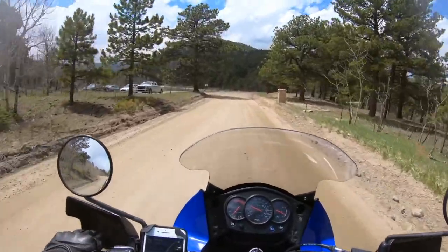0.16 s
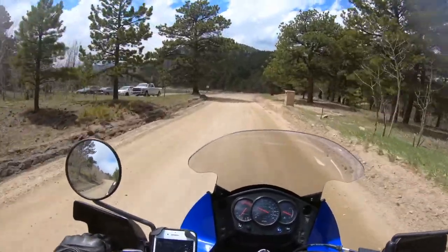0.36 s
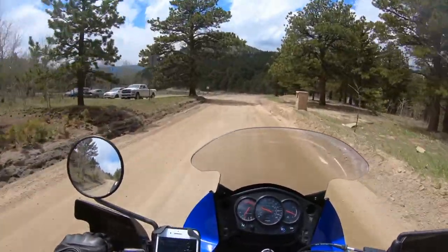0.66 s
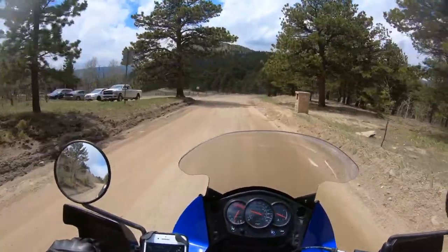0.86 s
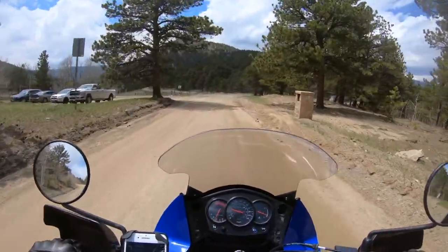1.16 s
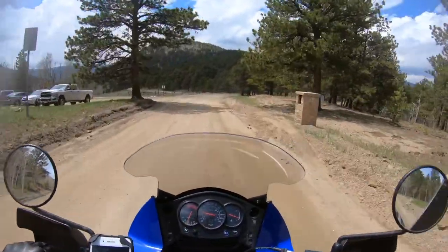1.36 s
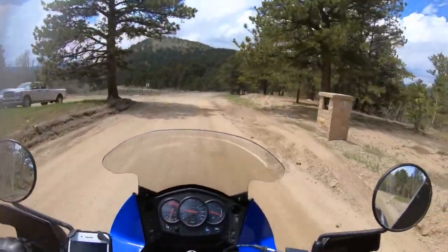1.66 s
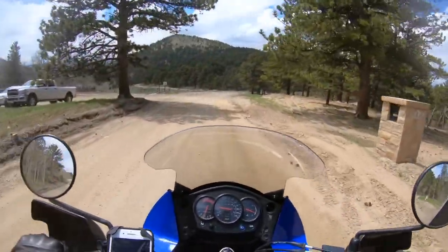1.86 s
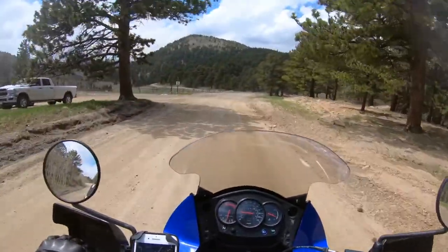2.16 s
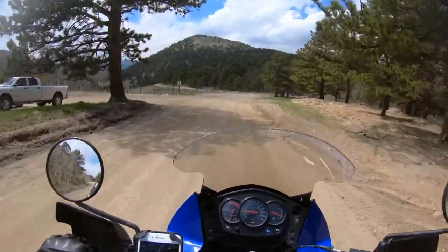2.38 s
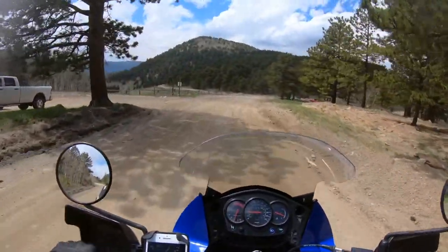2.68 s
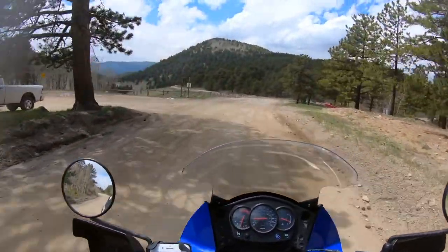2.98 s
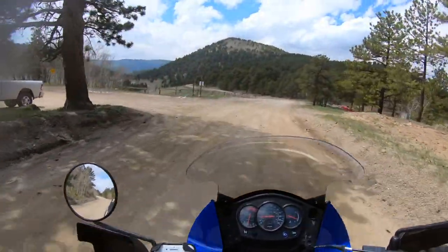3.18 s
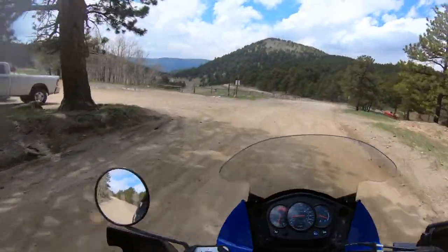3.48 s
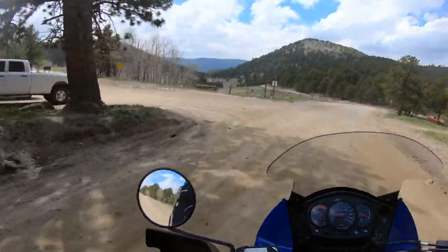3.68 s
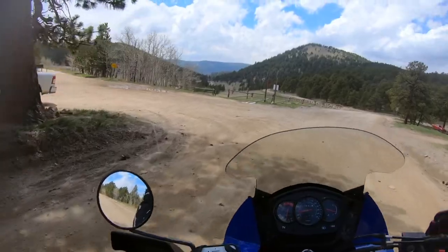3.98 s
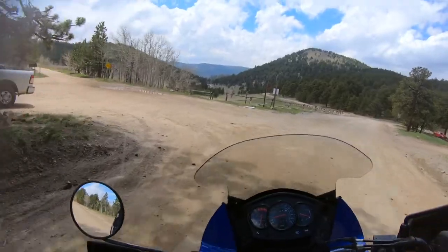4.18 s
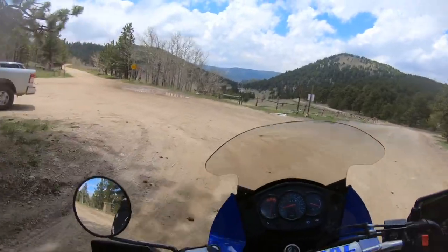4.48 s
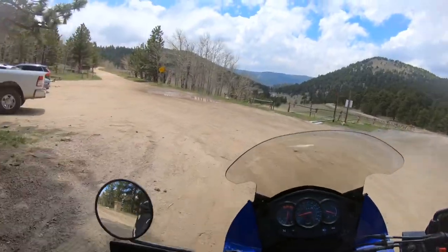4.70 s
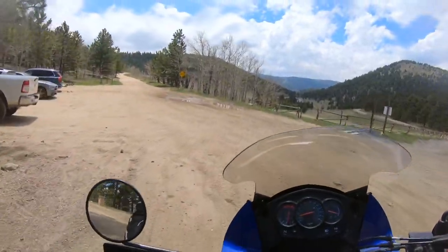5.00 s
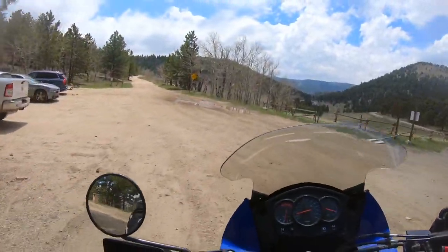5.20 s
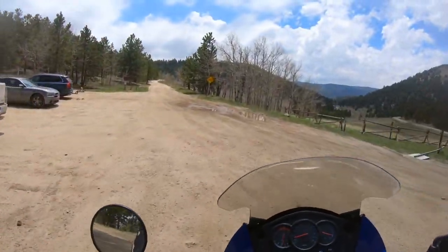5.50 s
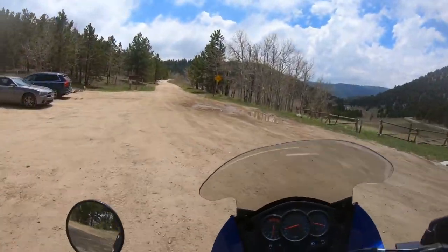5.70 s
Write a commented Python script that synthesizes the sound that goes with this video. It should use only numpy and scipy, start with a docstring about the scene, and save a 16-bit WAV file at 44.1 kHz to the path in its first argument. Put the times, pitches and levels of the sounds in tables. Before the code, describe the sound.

Close onboard sound of a thumping one-cylinder motorcycle: uneven hollow exhaust pops and a clattering engine case while it slows, a sharp bump with a short loose panel rattle, more scattered pops, a few weak beats, then a regular loaded chug. Tyres crunch over fine gravel beneath, with short sandy scrubs near the end. Low wind buffets the microphone; the place is open and without echo.

```python
"""A big single-cylinder engine barks and thuds unevenly, then pulls steadily: pulses ringing in an exhaust.
It drives a motorcycle on a gravel road, heard from the rider's seat; the case clatters and valves tick.
A bump knocks and shakes the panels: short damped rings. Filtered random clicks and noise make the tyres
crunch and scrub, and low noise makes the wind rumble on an overloaded microphone."""
import sys
import numpy as np
from scipy import signal
from scipy.fft import rfft, irfft
from scipy.io import wavfile

SR = 44100
rng = np.random.default_rng(int(sys.argv[2]) if len(sys.argv) > 2 else 0)


def generate_wav(sig):
    """Save sig (samples, or channels by samples) to the path in sys.argv[1] as 16-bit PCM at SR."""
    pcm = np.round(np.clip(np.atleast_2d(sig).T, -1, 1) * 32767).astype(np.int16)
    wavfile.write(sys.argv[1], SR, pcm)


N = 257984
TIME = np.arange(N) / SR  # seconds
BIN_HZ = np.arange(N // 2 + 1) * SR / N

# How fast the engine turns. Each row: time in seconds, speed in revolutions per minute.
ENGINE_SPEED = [(0.0, 2775.0), (0.54, 2558.0), (0.94, 2348.0), (1.21, 2280.0), (1.37, 2134.0),
                (1.78, 2066.0), (2.02, 1726.0), (2.09, 1917.0), (2.37, 2243.0), (2.94, 2020.0),
                (3.03, 1988.0), (3.32, 1955.0), (3.56, 1815.0), (4.54, 1783.0), (4.65, 1741.0),
                (5.1, 1893.0), (5.3, 1727.0), (5.68, 1923.0), (5.85, 1859.0)]


def undb(db):
    """Turn decibels into gain."""
    return 10 ** (np.asarray(db) / 20)


def curves(table):
    """The columns of a table, joined by straight lines in time."""
    s, *columns = np.transpose(table)
    return [np.interp(TIME, s, column) for column in columns]


def unit(x):
    """Scale to rms 1."""
    return x / np.sqrt(np.mean(x ** 2))


def band(hz, width):
    """Response of one resonance, gain 1 at the centre; width in Hz."""
    s = 1j * BIN_HZ
    return width * s / (s * s + width * s + hz * hz)


def modes(table):
    """Response of a body with several resonances."""
    return sum(undb(db) * band(hz, width) for hz, width, db in table)


def colour(points):
    """Response drawn through points of frequency in Hz and level in dB."""
    hz, db = np.transpose(points)
    return undb(np.interp(np.log(BIN_HZ + 1), np.log(hz), db))


def through(x, response):
    """Filter a whole sound."""
    return irfft(rfft(x) * response, N)


def strike(times, sizes, shape):
    """Place one copy of the first quarter second of a shape at each time."""
    positions = np.clip(np.asarray(times) * SR, 0, N - 1).astype(int)
    pulses = np.bincount(positions, sizes, N)
    return signal.fftconvolve(pulses, shape[:SR // 4])[:N]


def strike_tuned(times, sizes, pitches, shape):
    """Like strike, with each copy played faster or slower by its pitch ratio."""
    out, age = np.zeros(N + SR), np.arange(SR // 4)
    for s, size, pitch in zip(times, sizes, pitches):
        start = max(int(s * SR), 0)
        out[start + age] += size * np.interp(age * pitch, age, shape[age], right=0)
    return out[:N]


def ring(response):
    """The ring after one pulse, with peak 1."""
    shape = irfft(response, N)
    return shape / np.abs(shape).max()


def soften(x, ms):
    """Spread a push over a few milliseconds with a bell-shaped blur."""
    return through(x, np.exp(-.5 * (2 * np.pi * BIN_HZ * ms / 10 ** 3) ** 2))


def grains(rate, spread_db):
    """Random clicks, rate per second on average, most small and a few large; rms 1."""
    sizes = undb(spread_db * np.minimum(rng.exponential(size=N), 6))
    happens = rng.random(N) < rate / SR
    return unit(happens * sizes * rng.choice([-1, 1], N))


def walk(count):
    """A smooth random wander with rms 1, through count random points a second."""
    return unit(signal.resample(rng.standard_normal(int(count * N / SR)), N))


def gate(cycle, centre, width):
    """A smooth window that opens once per engine cycle; centre and width in cycles."""
    distance = (cycle - centre + .5) % 1 - .5
    return np.exp(-.5 * (distance / width) ** 2)


def exhaust():
    """Each stroke barks in the pipe and thuds in the silencer; a second push grows with throttle."""
    # Colour of the rough gas. Each row: frequency in Hz, relative level in dB.
    crack_colour = [(200, -15.5), (550, -1), (950, -6.5), (1300, -8.5), (1700, -11), (2400, -31),
                    (8000, -54.5)]
    s, bark, weight, throttle = strokes()
    # the pitch scatters most with the throttle shut
    heat = 1 + 0.029 * (1 - throttle) * rng.standard_normal(len(s))
    # two chambers in series, then the longer ring of the tailpipe
    pipe = ring(band(210, 53) * band(291.1, 29.6) * (1 + 5.83 * band(343.55, 16)))
    blowdown = strike_tuned(s - .002, 1.162 * bark, heat, pipe)
    # the pressure in the silencer dips as the valve opens
    thud = soften(strike(s - .0013, -undb(.5) * weight, ring(band(73, 38))), ms=1.15)
    # the rising piston drives out the rest of the charge into the warmed pipe
    sweep = strike_tuned(s + 0.003926, -1.1 * bark * throttle ** 2.5, 1.02 * heat, pipe)
    boom_size = -(.4 + 1.4 * throttle ** 2) * np.sqrt(weight)
    boom = soften(strike(s + 0.01, boom_size, ring(band(73.6, 16.6))), ms=2.97)
    # the tailpipe sings on between strokes, with an overtone; both grow with throttle
    tail = strike(s + 0.00941, 0.049 + 0.11 * throttle, ring(band(341, 20) * band(370, 230)))
    overtone_times = s + .001 * rng.standard_normal(len(s))
    overtone_ring = ring(band(546, 12) * band(546, 200))
    overtone = strike(overtone_times, bark * (0.27 + throttle), overtone_ring)
    # hard firings at low throttle snap most, with a burst of rough gas
    hard = np.minimum(bark, 1.1) ** 3 * (1 - throttle ** 3)
    snap_ring = ring((band(690, 110) + .3 * band(1600, 350)) * band(800, 1200))
    snap = strike(s - .0028, .11 * hard, snap_ring)
    burst = soften(strike(s - .0028, hard, np.exp(-TIME / .007)), ms=0.66)
    crack = burst * unit(through(rng.standard_normal(N), colour(crack_colour)))
    return (blowdown + thud + sweep + boom + tail + undb(-31) * overtone
            + snap + undb(-19.0) * crack)


def strokes():
    """Time, bark, thud and throttle of the strokes: more throttle is louder and steadier."""
    # Unburnt mixture catches in a pop. Each row: time in seconds, relative bark level in dB.
    pops = [(.105, -1), (.42, -0.7), (.56, -0.1), (.703, -3), (.802, -2.9), (.953, -0.7), (1.108, -1.2),
            (1.266, -7.5), (1.376, -7.5), (1.49, -6), (1.603, -2), (1.776, -3), (2.274, -2.5),
            (2.382, -2.5), (2.491, -1.5), (2.601, -6.5), (2.772, -4.5), (2.888, -4.5), (3.007, -2.4),
            (3.129, -5), (3.249, -4)]
    # A stroke falls weak. Each row: time in seconds, change of bark and thud level in dB.
    stumbles = [(.287, -0.5), (2.217, -2.5), (3.065, -2), (3.312, -4.5), (3.57, -7), (3.702, -6),
                (3.835, -3.5), (4.034, -5.5), (4.236, -3), (4.369, -10)]
    shut_db, rise_db = -13, 9  # bark with the throttle shut, and its rise at full throttle
    pop_lead_s, pop_thud_db = 0.0034, -1  # how early a pop leaves the pipe, and its thud
    _, s = crank()
    throttle = opening(s)
    scatter_db = 1.04 * (1.2 - throttle) * rng.standard_normal((len(s), 2)).T
    bark_db = shut_db + rise_db * throttle + scatter_db[0]
    thud_db = .5 * scatter_db[1]
    # each pop or stumble takes the nearest stroke
    for at, db in pops:
        k = np.argmin(abs(s - at))
        s[k] -= pop_lead_s
        bark_db[k], thud_db[k] = db, pop_thud_db
    for at, db in stumbles:
        k = np.argmin(abs(s - at))
        bark_db[k] += db
        thud_db[k] += db
    return s, undb(bark_db), undb(thud_db), throttle


def crank():
    """Engine cycles run so far, each two revolutions, and the times the exhaust valve opens."""
    first_stroke_s = .0219
    rpm, = curves(ENGINE_SPEED)
    cycle = np.cumsum(rpm / 60 / 2) / SR
    cycle = cycle - np.interp(first_stroke_s, TIME, cycle)
    return cycle, np.interp(np.arange(int(cycle[-1]) + 1), cycle, TIME)


def opening(s):
    """Throttle opening at the given times, which sets the load on the engine."""
    # The rider's hand. Each row: time in seconds, throttle from 0 (shut) to 1 (full).
    throttle_points = [(0, 0.12), (1.65, 0), (1.78, .4), (1.9, 0.2), (1.98, .68), (2.15, 0.6), (2.35, .48),
                       (2.8, .33), (2.98, .05), (3.3, .05), (3.48, .88), (4.4, .9), (4.65, 0.98),
                       (5.85, 0.99)]
    return np.clip(np.interp(s, *np.transpose(throttle_points)), 0, 1)


def machinery(clatter_db):
    """Piston slaps and gears rattle the case; valves tick as they seat; the chain hisses with load."""
    # Resonances of engine case and fairing. Each row: frequency in Hz, width in Hz, relative level in dB.
    case_modes = [(560.6, 73, 6.5), (677, 55, 5.5), (799, 42, -0.5), (886.6, 30.2, 5), (1134, 80, -8.5),
                  (1450, 45, -25.5)]
    # Resonances of the valve gear. Each row: frequency in Hz, width in Hz, relative level in dB.
    valve_modes = [(3600, 450, -5), (6156, 100, 0), (6384, 90, -1)]
    cycle, s = crank()
    throttle, load = opening(TIME), opening(s)
    rpm, = curves(ENGINE_SPEED)
    body = modes(case_modes) * band(650, 850)
    # one slap shortly before each exhaust stroke, harder and earlier on throttle
    chance = rng.standard_normal((len(s), 4)).T
    force = (.5 + .5 * load) * undb(1.6 * chance[0])
    slap_times = s - .007 - 0.0066 * load + 0.00091 * chance[1]
    slap = soften(strike(slap_times, force, ring(body)), ms=0.11)
    # a lighter clack after the stroke grows with load
    clack_ring = ring(band(930, 36) * band(930, 500))
    clack = strike(s + .016 + .0012 * chance[2], load * undb(1.8 * chance[3]), clack_ring)
    # the gears mesh more loudly at two points of the cycle
    driven = (0.11 + 0.16 * throttle) * gate(cycle, centre=0.11, width=0.22)
    slack = .45 * (1 - throttle) * gate(cycle, centre=.8, width=0.041)
    gears = through(grains(rate=2500, spread_db=0.5) * (0.65 + driven + slack), body)
    # under load a hollow resonance of the case stands out
    hollow_clicks = grains(rate=2500, spread_db=0.5) * gate(cycle, centre=.85, width=.15)
    hollow_ring = unit(through(hollow_clicks, band(545, 40) ** 2))
    hollow = throttle * undb(clatter_db - 8) * hollow_ring
    seating = .25 + gate(cycle, centre=.28, width=.04) + .45 * gate(cycle, centre=.88, width=.05)
    valve_clicks = grains(rate=2600, spread_db=1.9) * seating
    ticks = through(valve_clicks, modes(valve_modes) * band(3300, 2600))
    # the valve gear also sings without ticking, more at higher revs
    sing = unit(through(rng.standard_normal(N), modes(valve_modes) * band(5800, 700)))
    sing = sing * (rpm / rpm.mean()) ** 1.3
    chain = unit(through(rng.standard_normal(N), band(7200, 5000) ** 2))
    chain = chain * (.2 + 0.9 * throttle) * (0.49 + gate(cycle, centre=.3, width=0.11))
    return (undb(-17.5) * slap + undb(-29.5) * clack + undb(clatter_db - .5) * unit(gears) + hollow
            + undb(-59.5) * unit(ticks) + undb(-71) * sing + undb(-64.0) * chain)


def bodywork():
    """Each knock is a short, damped rattle of a struck body; something squeaks thinly."""
    # Bumps, and loud piston slaps as the engine starts to pull.
    # Each row: time in seconds, level in dB, pitch in Hz.
    knocks = [(1.912, -23, 1500), (2.0135, -8, 900), (2.022, -12, 620), (2.065, -10, 690),
              (2.133, -15, 750), (2.147, -20, 850), (2.18, -23, 1300), (3.426, -17.5, 680),
              (3.555, -15.5, 580), (3.621, -17.5, 580), (3.687, -15.5, 570)]
    # Thin squeaks. Each row: time in seconds, pitch in Hz, peak level in dB.
    squeaks = [(2.18, 12800, -57), (2.44, 12500, -65)]
    out = np.zeros(N)
    for s, db, hz in knocks:
        resonances = band(hz, .17 * hz) + .25 * band(1.7 * hz, .4 * hz)
        rattle = ring(resonances * band(hz, 1.3 * hz) ** 2)
        # one firm contact, then a spray of fading bounces
        delay = np.r_[0, .002 + rng.exponential(.014, 30)]
        sizes = np.r_[1, .16 * rng.standard_normal(30)] * np.exp(-delay / .03)
        out += strike(s + delay, undb(db) * sizes, rattle)
    for s, hz, db in squeaks:
        swell = np.exp(-.5 * ((TIME - s) / .005) ** 2)
        out += undb(db) * np.sin(2 * np.pi * hz * TIME) * swell
    return out


def shake():
    """After the bump loose panels rattle densely and settle: clicks through wide resonances."""
    start_s, rise_s, fade_s = 2.02, 0.17, .2
    age = np.maximum(TIME - start_s, 0)
    swell = np.minimum(age / rise_s, 1) * np.exp(-np.maximum(age - rise_s, 0) / fade_s)
    panels = band(640, 300) + .4 * band(900, 150) + .3 * band(1350, 300)
    panels = panels * band(750, 1100) ** 2
    return undb(-25.5) * swell * unit(through(grains(rate=630, spread_db=0.5), panels))


def tyres(gravel_db):
    """Small stones crunch under the tread and a few snap away; loose sand hisses in short scrubs."""
    # Colours of gravel and sand. Each row: frequency in Hz, relative level in dB.
    gravel_colour = [(150, 4.5), (400, 12), (900, 3.5), (1300, 16.5), (1700, 4.5), (2300, 2.5), (3700, 4.5),
                     (5000, -2), (6500, -9.5), (8000, -14.5), (10000, -25.5), (15500, -43.5)]
    sand_colour = [(600, -7), (1400, 8.5), (2000, 6.5), (2800, 0.5), (3700, 5), (5000, -11.5), (8000, -20),
                   (15000, -26)]
    # Scrubs through loose sand. Each row: centre in seconds, bell-curve spread in seconds, level in dB.
    scrubs = [(5.42, 0.022, -37), (5.605, 0.027, -36), (5.759, 0.049, -37.5)]
    crunch = unit(through(grains(rate=7800, spread_db=2.0), colour(gravel_colour)))
    stones = unit(through(grains(rate=90, spread_db=2.1), band(8000, 5000) * band(5000, 5000)))
    flutter_db = 1.6 * walk(count=50)
    scrub = sum(undb(db) * np.exp(-.5 * ((TIME - s) / spread) ** 2) for s, spread, db in scrubs)
    sand = unit(through(rng.standard_normal(N), colour(sand_colour)))
    return undb(gravel_db + flutter_db) * (crunch + undb(-27.5) * stones) + scrub * sand


def wind(wind_db):
    """Eddies from the windscreen buffet the microphone: mostly very low noise."""
    # Colour of the wind. Each row: frequency in Hz, relative level in dB.
    wind_colour = [(8, -5), (22, 3), (45, -0.5), (90, -4.5), (150, -17), (300, -13.5), (600, -48),
                   (2000, -93)]
    return undb(wind_db) * unit(through(rng.standard_normal(N), colour(wind_colour)))


def scene():
    """Everything moves with the microphone, in open air without echoes."""
    # Levels of engine clatter, gravel crunch and wind. Each row: time in seconds, level in dB.
    clatter_level = [(0, -28), (1.3, -29.5), (3.2, -28.5), (3.5, -28), (4.4, -28.5), (4.9, -30.5),
                     (5.85, -30.5)]
    gravel_level = [(0, -45.5), (1.1, -51.5), (2.3, -42.5), (2.6, -47), (3.3, -41), (4.3, -42.5),
                    (5.5, -43.5), (5.85, -44.5)]
    wind_level = [(0, -21), (1.35, -17.5), (1.8, -18), (2.2, -15), (2.5, -19), (3.1, -17.5), (3.6, -16),
                  (4.8, -25.5), (5.85, -40)]
    engine = exhaust() + machinery(*curves(clatter_level))
    knocking = bodywork() + shake()
    road = tyres(*curves(gravel_level)) + wind(*curves(wind_level))
    return (engine + knocking + road)[None]


def record(dry):
    """The recorder rounds off the loudest peaks and cuts the top of the treble."""
    top_hz = 15750
    rounded = .97 * dry / (1 + dry ** 8) ** (1 / 8)
    # steep low-pass: 0.1 dB ripple below the edge, 80 dB down above it
    low_pass = signal.ellip(10, .1, 80, top_hz, fs=SR, output="sos")
    return signal.sosfilt(low_pass, rounded)


dry = scene()
out = record(dry)
generate_wav(out)
```